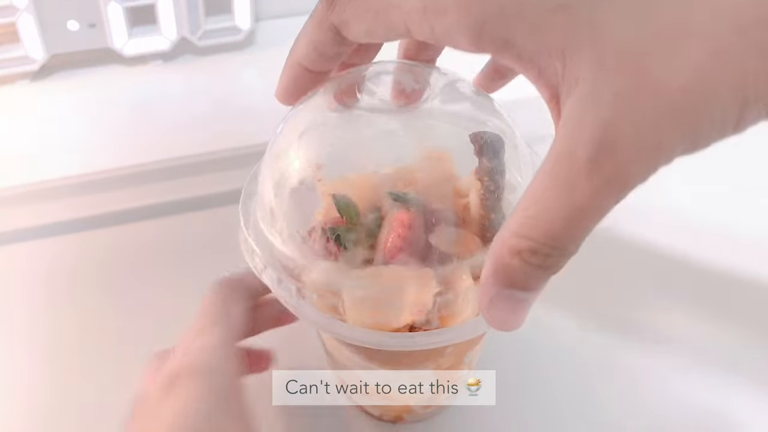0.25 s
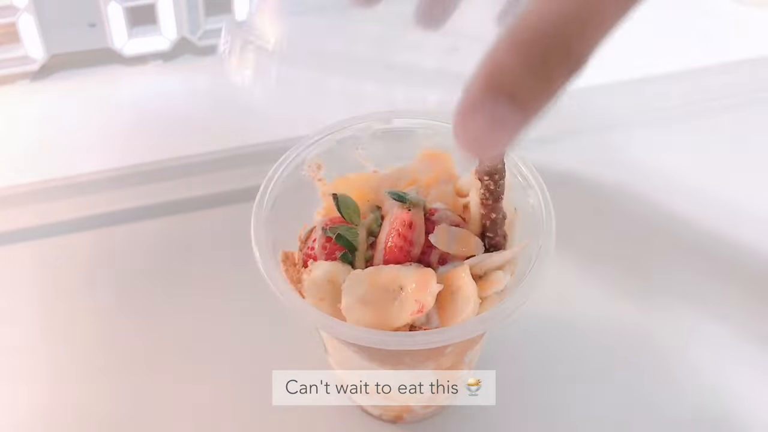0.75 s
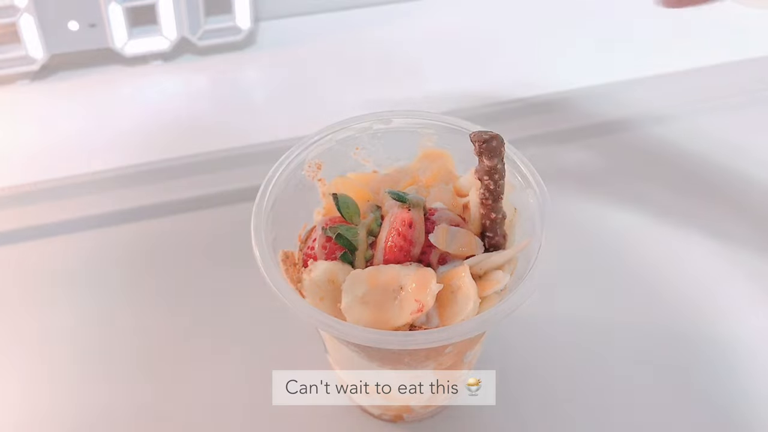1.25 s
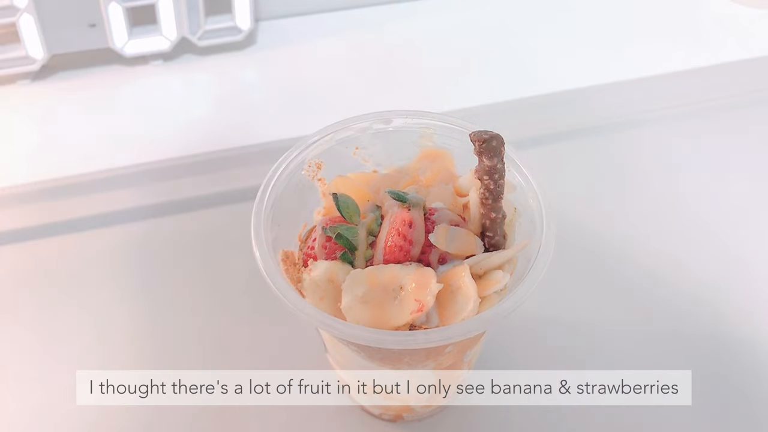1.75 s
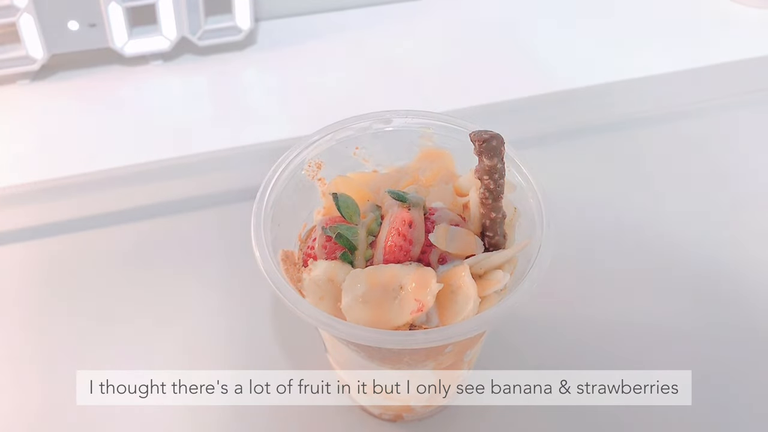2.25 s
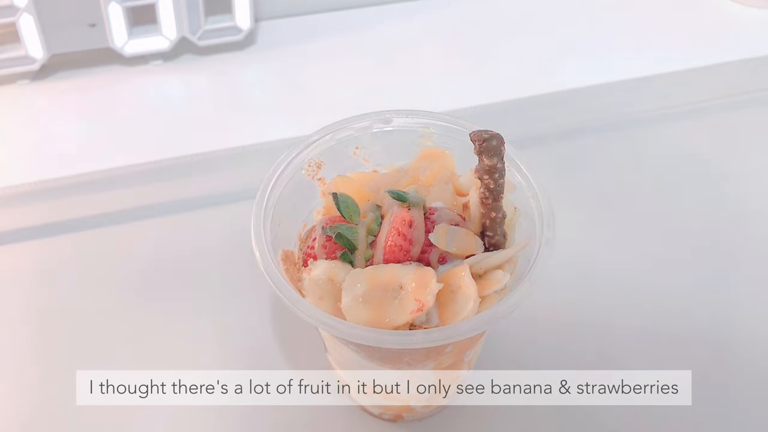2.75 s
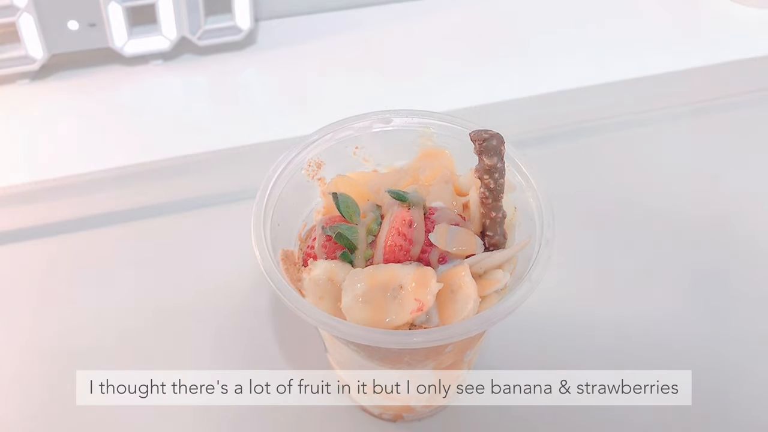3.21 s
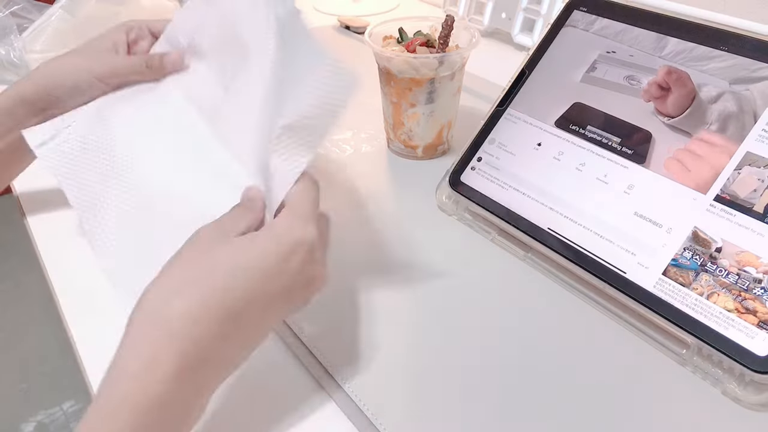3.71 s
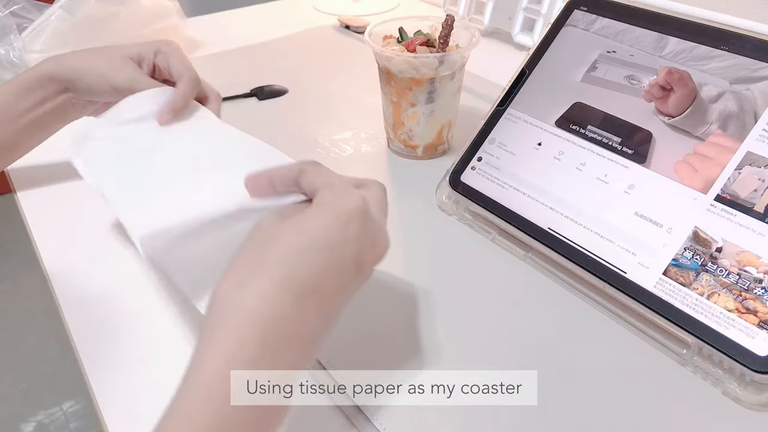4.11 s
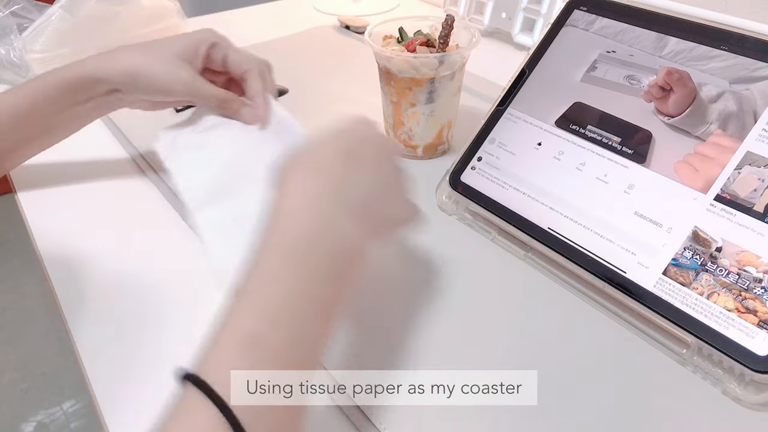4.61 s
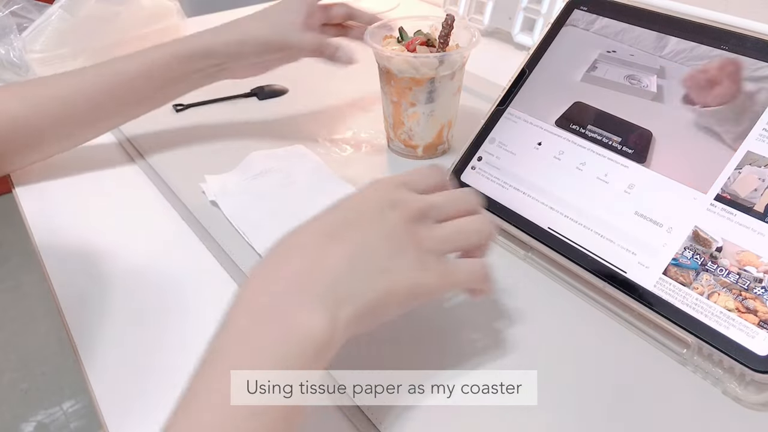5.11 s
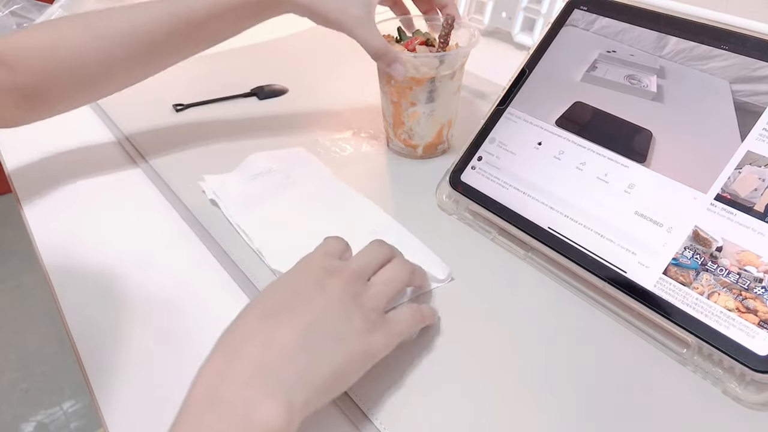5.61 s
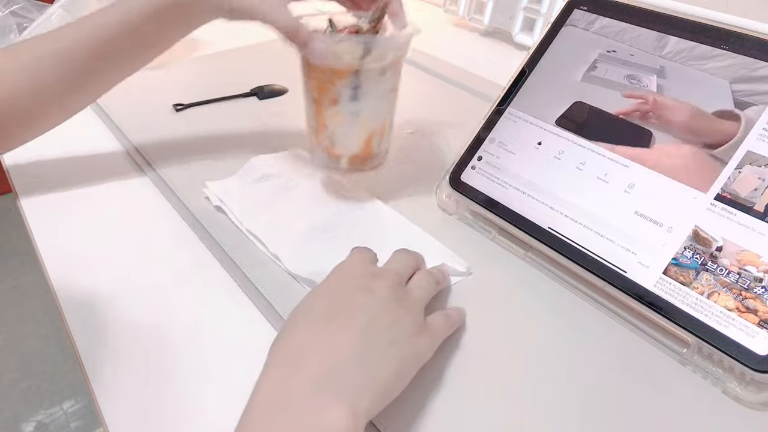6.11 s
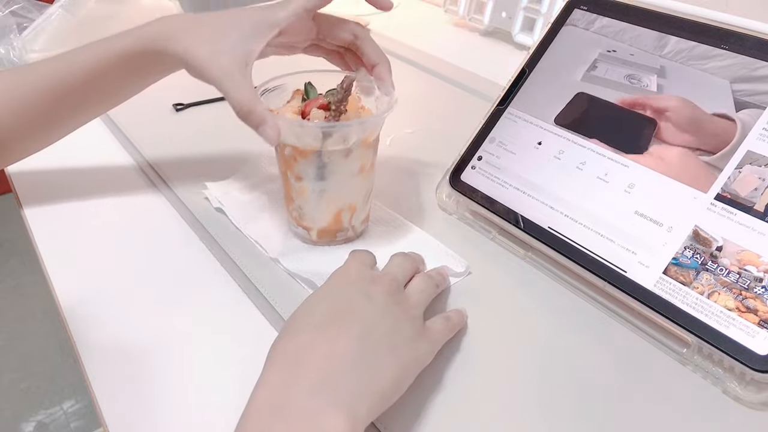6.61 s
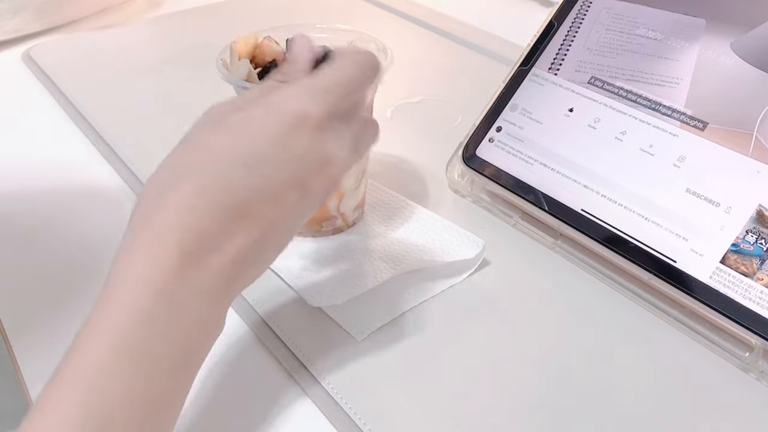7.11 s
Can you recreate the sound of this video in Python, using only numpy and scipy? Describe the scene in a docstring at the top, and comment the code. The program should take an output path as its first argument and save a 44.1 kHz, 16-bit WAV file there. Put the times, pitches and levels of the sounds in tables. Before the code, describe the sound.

A thin plastic dome lid clatters and rocks on a desk, then tissue rustles and a cup is set down in a softly rumbling room.

```python
"""Faint rubbing and a dry snap over rumbling, hissing room air come first, then a thin plastic dome lid
lifted off a cup scrapes, drops and rocks on a desk: short noise cracks and ringing tones.
A paper tissue is shaken open; the level dips briefly, and it is folded and smoothed: grainy noise.
The cup is lifted, set down and touched with a spoon: noise bursts, with an airy whistle and a desk hum."""
import sys
import numpy as np
from scipy import signal
from scipy.fft import rfft, irfft, next_fast_len
from scipy.io import wavfile
from scipy.ndimage import uniform_filter1d, map_coordinates

SR = 44100
rng = np.random.default_rng(int(sys.argv[2]) if len(sys.argv) > 2 else 0)


def persist_wave(psi):
    """Save psi, clipped to +-1, as 16-bit WAV."""
    counts = np.round(np.clip(psi, -1, 1) * 32767).astype(np.int16)
    wavfile.write(sys.argv[1], SR, np.atleast_2d(counts).T)


N = 324135

# Each touch of lid and desk; the pitches choose which tone of rim and dome leads. Levels before trims:
# start_s, contact_s, rim_db, rim_hz, dome_db, dome_hz, desk_db
LID_CONTACTS = [(1.878, 0.0017, -42, 5460, -47, 2030, -49), (1.9804, .0003, -24.5, 3490, -36, 2020, -38),
                (1.994, 0.013, -24, 3423, -39, 2020, -32), (1.999, 0.0006, -23.5, 5830, -53, 2030, -67),
                (2.013, 0.012, -24.5, 4090, -35, 1880, -63), (2.028, 0.0084, -31, 4200, -55, 2030, -35),
                (2.037, 0.0066, -30, 3150, -50, 2030, -52), (2.0458, 0.0006, -32, 5900, -52, 2030, -43),
                (2.103, 0.0052, -36, 4300, -57, 2060, -56), (2.113, .01, -35, 4400, -60, 2030, -58),
                (2.13, 0.004, -37, 4400, -60, 2030, -62), (2.1478, 0.0013, -24, 3240, -31, 2040, -24),
                (2.1493, 0.002, -17, 4680, -27, 1970, -16), (2.1988, .0001, -18, 3050, -10, 2200, -15),
                (2.2178, 0.0041, -23, 3750, -22, 1880, -23.5),
                (2.2656, 0.0023, -20, 4400, -27, 1920, -24.5),
                (2.2691, 0.0023, -23.5, 3680, -14.5, 1720, -25), (2.282, 0.0043, -28, 3610, -34, 1780, -40),
                (2.306, 0.0042, -27, 3500, -18, 1850, -21), (2.332, 0.0063, -29.5, 3460, -33, 1820, -31),
                (2.347, 0.0041, -31.5, 3360, -30, 1875, -30), (2.554, 0.002, -42, 4380, -46, 1820, -45.5),
                (2.601, 0.00085, -32.5, 4300, -51, 1820, -40),
                (2.603, 0.002, -32.5, 3240, -30.5, 1820, -28), (2.645, 0.0033, -36, 4470, -30.5, 1867, -26),
                (2.668, 0.008, -43, 4400, -35, 1890, -29), (2.684, 0.0038, -44.5, 3640, -34, 1870, -41),
                (2.695, 0.01, -47, 3610, -38, 1856, -35.5), (2.808, 0.019, -45, 3970, -43.5, 1780, -45),
                (2.839, 0.0089, -45.5, 3180, -45, 1720, -37.5), (2.97, 0.0063, -41, 3790, -38.5, 1855, -49),
                (3.0114, 0.0029, -39, 4400, -34, 1940, -33.5),
                (3.024, 0.015, -41.5, 4400, -37.5, 1816, -35)]
# Tones of the lid's rim: pitch_hz, level_db, time_to_fade_60_db_s
RIM_TONES = [(2900, 6, 0.014), (3227, 8.5, 0.019), (3507, 11, 0.016), (4070, 14.5, 0.0083),
             (4400, 10.5, 0.016), (4800, -7, 0.019), (5830, 3, 0.0087)]
# Tones of the lid's dome: pitch_hz, level_db, time_to_fade_60_db_s
DOME_TONES = [(1490, 3, 0.02), (1720, 0.5, 0.031), (1820, 4, 0.03), (1910, 1, 0.021), (1978, -3, 0.023),
              (2250, 5.5, 0.0056)]
# Long rings of the desk top: pitch_hz, level_db, time_to_fade_60_db_s
DESK_TONES = [(135.6, -5.5, 0.21), (172.7, 0.5, 0.95), (216.7, 0.5, 0.16), (278, -3.5, 0.12),
              (335, -13.5, 0.69), (823, -12.5, 0.22)]
# The hollow of the lid, woken by flat drops: pitch_hz, level_db, time_to_fade_60_db_s
HOLLOW_TONES = [(568, -7.5, 0.14), (715, -0.5, 0.19)]
# The rim chatters while the lid slides and rocks: peak_s, rise_s, fall_s, level_db
RIM_CHATTER = [(2.02, 0.079, 0.15, -40.5), (2.14, 0.25, .07, -59), (2.25, .06, 0.18, -54),
               (2.69, 0.17, 0.47, -50.5)]
CRACK_DB = 2  # added to the rim level
SMEAR_S = 0.002  # a contact this long favours its leading rim tone half as much
SCRAPE_S = 0.0028  # a contact this long is half first touch, half scrape


def lid():
    """Each contact cracks, thumps and rings rim, dome and desk; small chatter feeds the same shell."""
    out = np.zeros(N + SR)
    long_t = np.arange(SR) / SR
    t = long_t[:SR // 4]
    for start_s, contact_s, rim_db, rim_hz, dome_db, dome_hz, desk_db in LID_CONTACTS:
        noise = rng.standard_normal((4, len(t)))
        # only hard blows ring the desk and wake the whole rim; only the hardest land flat
        hard = np.clip(amp(2.5 * (desk_db + 22)), 0, 1)
        flat = np.clip(amp(3 * (desk_db + 17)), 0, 1)
        smear = 1 + contact_s / SMEAR_S
        picky = (1 - hard / 2) / smear

        crack_fade = amp(-60 * t / 0.0064) + 0.18 * amp(-60 * t / 0.19)
        crack = band(noise[0], 2300, 13500) * crack_fade * (1 - np.exp(-t / 0.000071))
        thump = 6 * band(noise[1], 49, 527) * amp(-60 * t / 0.15)
        # the burr is noise with one sharp click at its start
        click = (9 + 17 * flat / smear) * (t == 0)
        burr = (0.79 + 1.34 * hard) * band(noise[2] - click, 1400, 5800) * amp(-60 * t / 0.0041)
        rim = (1 - hard / 2) * ring(RIM_TONES, t, 0.00069, rim_hz, picky)
        dome = ring(DOME_TONES, t, 0.0011, dome_hz, 0.7)
        blow = amp(rim_db + CRACK_DB) * crack
        blow += amp(dome_db - 2.0) * dome + amp(rim_db - 6.0) * (rim + burr)

        # spread the blow over the contact time, keeping its loudness
        hump = np.sin(np.pi * np.clip((t + 1 / SR) / max(contact_s, 0.0001), 0, 1))
        scrape = noise[3] * hump
        touch = (t == 0) + contact_s / SCRAPE_S * scrape / np.linalg.norm(scrape)
        spread_blow = signal.fftconvolve(blow, touch[:SR // 40])[:len(t)]
        blow = unit(spread_blow) * np.std(blow)

        desk = hard * ring(DESK_TONES, long_t, 0.00074)
        hollow = flat * ring(HOLLOW_TONES, long_t, 0.002)
        first = round(start_s * SR)
        out[first:][:len(t)] += blow + amp(desk_db - 7.0) * thump
        out[first:][:SR] += amp(desk_db - 5.5) * (desk + hollow)

    def shell(f):
        """The lid answers at all its tones, over an even floor, with weaker lows and highest treble."""
        tones = sum(amp(db) * resonance(hz, 6.9 / t60)(f) for hz, db, t60 in DOME_TONES + RIM_TONES)
        return (11.0 + tones) * f / (f + 900) / (1 + (f / 12000) ** 2)

    chatter = unit(filtered(grainy(190, 4.0, 0.0023, 0.6), shell))
    return out[:N] + swells(RIM_CHATTER)[0] * chatter


FLUTTER = 0.7  # depth of the loose shell's wavering
FAR_DB_PER_OCTAVE, FAR_MOST_DB = 70, 16  # tones far from the leading one answer less; scaled by picky


def ring(modes, t, attack, near_hz=None, picky=1):
    """One blow on a set of tones; the loose shell bends until one tone sits on near_hz and leads."""
    hz, db, t60 = np.transpose(modes)[..., None]
    if near_hz:
        lead = hz[np.argmin(np.abs(hz - near_hz))]
        db = np.where(hz == lead, db.max(), db)
        hz = hz * near_hz / lead
    tones = amp(db - 60 * t / t60) * np.sin(2 * np.pi * hz * t) * (1 - np.exp(-t / attack))
    if near_hz:
        flutter = uniform_filter1d(rng.standard_normal(tones.shape), size=160)
        far_db = np.minimum(FAR_DB_PER_OCTAVE * np.abs(np.log2(hz / near_hz)), FAR_MOST_DB)
        tones *= amp(-picky * far_db) * (1 + FLUTTER * unit(flutter))
    return tones.sum(axis=0)


# The tissue is shaken open, then folded and smoothed: time_s, fizz_db, brightness_db
TISSUE_MOVES = [
    [(3.12, -57, -2), (3.636, -43, -2), (3.672, -43.5, -5)],
    [(3.674, -51.5, -3), (3.734, -41, -7), (3.892, -36.5, -7), (3.952, -39, -7), (4.198, -39.5, -3),
     (4.208, -37.5, -1), (4.312, -49, -7.5), (4.46, -48.5, -6.5), (4.529, -58, -4)],
    [(4.53, -48, -9), (4.55, -36.5, -5), (4.62, -28.5, -3), (4.686, -30, 3), (4.79, -38.5, -3),
     (4.864, -37, -1.5), (5.0, -56.5, -6), (5.3, -68, -12)],
]
# Single strokes of skin, paper and spoon: peak_s, rise_s, fall_s, fizz_db, brightness_db
SINGLE_STROKES = [(0.24, 1, 0.37, -59.5, -13), (1.65, 1.3, 0.35, -57.5, -6), (5.356, 0.017, 0.061, -40, -4),
                  (5.485, 0.013, 0.11, -34.5, -4.5), (5.68, 0.35, 0.067, -47, -7),
                  (6.12, 0.59, 0.078, -47, -5), (6.45, 0.43, 0.35, -57.5, -10), (7.0, 2.4, 1, -63, -9),
                  (7.192, 0.047, 0.23, -54.5, -16)]
# Tone colour of the fizz: pitch_hz, level_db (per Hz, only the shape counts)
FIZZ_COLOUR = [(880, -6.5), (1500, -1.5), (1800, 0.5), (4350, 3), (4740, 0.5), (6460, 3), (10000, -11.5),
               (13000, -36), (22000, -120)]
# Tone colour of the duller body: pitch_hz, level_db (per Hz, only the shape counts)
BODY_COLOUR = [(120, -120), (220, 1), (500, 0.5), (800, -2), (1700, -1), (3000, -40), (6000, -120)]
# The taut sheet drones in its middle range: peak_s, rise_s, fall_s, level_db
TAUT_SHEET = [(4.625, 0.067, 0.065, -37), (4.68, 0.057, 0.18, -35.5)]
TAUT_HZ, TAUT_WIDTH_HZ = 1580, 430
UNSTEADY_DB, CHANGES_PER_S = 2, 27  # hands never slide evenly


def rustle():
    """Fibres slip in dense grains: a fizz, its airy top and the duller body of the sheet."""
    fizz, top, body = gains(*map(layers, TISSUE_MOVES)) + swells(layers(SINGLE_STROKES))
    knots = rng.standard_normal(int(N / SR * CHANGES_PER_S) + 4)
    wander = map_coordinates(knots, [np.arange(N) / SR * CHANGES_PER_S])
    slips = amp(UNSTEADY_DB * wander) * grainy(370, 1.7, 0.00077, 0.13)
    sheet = grainy(150, 3, 0.008, 0.6)
    taut = swells(TAUT_SHEET)[0] * unit(filtered(sheet, resonance(TAUT_HZ, TAUT_WIDTH_HZ)))
    airy_top = top * unit(band(slips, 7880, 15300))
    return taut + fizz * coloured(slips, FIZZ_COLOUR) + airy_top + body * coloured(sheet, BODY_COLOUR)


# Duller sliding has more body, set relative to the fizz
BODY_DB, BODY_PER_DULL, BODY_MOST_DB = -20.5, 2.2, 2


def layers(rows):
    """Turns fizz and brightness into the levels of fizz, airy top and body."""
    levels = []
    for *when, db, bright in rows:
        body_db = db + min(BODY_DB - BODY_PER_DULL * bright, BODY_MOST_DB)
        levels.append((*when, db, db + bright, body_db))
    return levels


# Dry snaps of fingers, paper creases and spoon, levels before trims:
# start_s, level_db, pitch_hz, thud_db
DRY_SNAPS = [(0.31, -40.5, 4000, -66), (0.903, -38, 4500, -70), (0.912, -32, 5050, -73),
             (1.194, -29, 780, -31), (3.475, -30.5, 2510, -43), (3.63, -35, 1080, -36.5),
             (4.536, -36, 3500, -71), (5.342, -27.5, 3660, -47), (5.352, -29.5, 3800, -44),
             (5.354, -33, 990, -58), (5.4835, -26.5, 3180, -51), (5.484, -27, 885, -52),
             (5.512, -25.5, 5440, -73), (6.749, -34.5, 600, -41), (7.1758, -23.5, 4600, -50),
             (7.1762, -30, 1260, -59), (7.297, -47, 1300, -70)]
# Soft scuffs of hand and cup on the desk, levels before trims: start_s, level_db, pitch_hz, thud_db
SOFT_SCUFFS = [(4.343, -36.5, 1240, -39.5), (4.892, -23, 890, -42), (5.607, -31.5, 690, -53),
               (6.046, -26.5, 655, -62), (6.109, -31, 2000, -70), (6.107, -21, 770, -60),
               (6.407, -22, 615, -38), (6.43, -19.5, 420, -58), (6.432, -30.5, 1760, -62),
               (6.51, -36, 590, -41), (6.679, -37, 490, -36), (6.715, -41, 400, -48)]


def ticks():
    """Short snaps start at once; longer, softer scuffs swell in more slowly."""
    snaps = bursts(DRY_SNAPS, rise=0.000057, length=0.016, spread=1.55, air=0.5, blow=2.64)
    return snaps + bursts(SOFT_SCUFFS, rise=0.0087, length=0.14, spread=1.22, air=0.33, blow=0)


def bursts(table, rise, length, spread, air, blow):
    """Noise bursts around a broad pitch, each with a dull thud; blow is the weight of the first contact."""
    out, t = np.zeros(N + SR), np.arange(SR // 4) / SR
    for start_s, db, hz, thud_db in table:
        noise = rng.standard_normal((2, len(t))) * (1 - np.exp(-t / rise)) + blow * np.exp(-t / 0.0001)
        snap = band(noise[0], hz / spread, hz * spread) * np.sqrt(9000 / hz)
        snap += air * band(noise[0], hz, 4 * hz)
        snap *= amp(-60 * t / length)
        thud = band(noise[1], 168, 336) * amp(-60 * t / (length + 0.024))
        out[round(start_s * SR):][:len(t)] += amp(db - 1.5) * snap + amp(thud_db + 20.5) * thud
    return out[:N]


# A narrow airy hiss near 8.5 kHz: peak_s, rise_s, fall_s, level_db
AIRY_WHISTLE = [(5.0, .05, 2.8, -60.5), (6.112, 0.11, 0.028, -45.5)]
# The desk hums as the cup is moved: peak_s, rise_s, fall_s, level_db
DESK_HUM = [(6.196, 0.073, 0.31, -36), (6.39, 0.069, 0.34, -40)]


def hums():
    """An airy whistle of narrow noise; the desk's hum is a steady tone wavering with noise beside it."""
    def narrow(hz, width_hz):
        """Noise passed twice through one resonance."""
        return unit(filtered(rng.standard_normal(N), lambda f: resonance(hz, width_hz)(f) ** 2))

    hum = 0.82 * np.sin(2 * np.pi * 229 * np.arange(N) / SR) + 0.47 * narrow(194, 235)
    return swells(AIRY_WHISTLE)[0] * narrow(8560, 350) + swells(DESK_HUM)[0] * hum


# Moving arms stir air and desk: peak_s, low_band_db, upper_band_db
ARM_RUMBLE = [(2.05, -57, -61), (2.65, -51, -46.5), (3.58, -48, -56.5), (3.85, -73, -42.5),
              (3.98, -51, -47.5), (4.4, -46.5, -52), (5.57, -44, -48.5), (6.66, -48, -76)]
# Tone colour of the steady air: pitch_hz, level_db (per Hz, only the shape counts)
AIR_COLOUR = [(15, 3.5), (40, 3.5), (110, -1.5), (200, -5.5), (500, -14.5), (1000, -16.5), (2500, -20),
              (4500, -24.5), (5300, -27), (6500, -24.5), (8000, -29.5), (12000, -32.5), (16000, -35)]
AIR_DB = -49.5
STIR_RISE_S, STIR_FALL_S = 0.27, 0.61  # for each swell of rumble
STILL_LOW_DB, STILL_UPPER_DB = -57.5, -63.5  # rumble at rest


def room():
    """Steady air noise, with two low bands that swell as arms move."""
    stirs = swells([(peak_s, STIR_RISE_S, STIR_FALL_S, *db) for peak_s, *db in ARM_RUMBLE])
    low, upper = amp([STILL_LOW_DB, STILL_UPPER_DB])[:, None] + stirs
    noise = rng.standard_normal((3, N))
    rumble = low * coloured(noise[0], [(10, -61), (25, 1), (50, 10.0), (75, 1), (130, -43.0)])
    rumble += upper * coloured(noise[1], [(60, -48), (92, 0.5), (106, -3), (135, -1.5), (250, -30.5)])
    return amp(AIR_DB) * coloured(noise[2], AIR_COLOUR) + rumble


def amp(db):
    """Turns decibels into a plain multiplier."""
    return 10 ** (np.asarray(db) / 20)


def unit(x):
    """Scales a sound to an average (rms) level of 1."""
    return x / np.sqrt(np.mean(x ** 2) + 1e-20)


def gains(*tables):
    """One gain per sample for each dB column, joined by straight lines; near silent outside the tables."""
    t = np.arange(N) / SR
    total = 0
    for table in tables:
        time_s, *columns = np.transpose(table)
        total = total + np.array([amp(np.interp(t, time_s, db, -200, -200)) for db in columns])
    return total


def swells(rows):
    """Gains per dB column; a swell climbs 20 dB in its rise time and drops 20 dB in its fall time."""
    peak_s, rise, fall, *columns = np.transpose(rows)[..., None]
    since = np.arange(N) / SR - peak_s
    shapes = amp(-20 * np.maximum(-since / rise, since / fall))
    return amp(np.array(columns)[..., 0]) @ shapes


def filtered(x, response):
    """Multiplies each frequency in x by the response there."""
    m = next_fast_len(N + SR // 2)
    return irfft(rfft(x, m) * response(np.fft.rfftfreq(m, 1 / SR)), m)[..., :N]


def coloured(x, points):
    """Shapes x through (Hz, dB) points on a log pitch axis, then scales it to rms 1."""
    f, db = np.transpose(points)
    return unit(filtered(x, lambda hz: amp(np.interp(np.log(hz + 1), np.log(f + 1), db))))


def resonance(centre_hz, width_hz):
    """The response of one ringing resonance, which never sounds before it is struck."""
    return lambda f: 1j * f * width_hz / (centre_hz ** 2 - f * f + 1j * f * width_hz)


def band(x, lo_hz, hi_hz):
    """Keeps the sound between two pitches, without sounding early."""
    sos = signal.butter(2, [lo_hz, min(hi_hz, 20000)], "band", fs=SR, output="sos")
    return signal.sosfilt(sos, x)


def grainy(rate, spread_db, life, share):
    """Noise whose loudness jumps in short grains of scattered size: rate per second, life in seconds."""
    starts = (rng.random(N) < rate / SR) * amp(spread_db * rng.standard_normal(N))
    grains = signal.lfilter([1], [1, -np.exp(-1 / (life * SR))], starts)
    return unit(rng.standard_normal(N) * (1 + share * unit(grains)))


def scene():
    """Near walls add a short tail to the hits; four tails take turns about every 25 ms."""
    hits = lid() + ticks()
    t = np.arange(SR // 2) / SR
    tails = band(rng.standard_normal((4, len(t))), 750, 5600) * amp(-60 * t / 0.35) * (t > 0.004)
    turn = np.arange(N) // (SR // 40) % len(tails)
    walls = np.zeros(N)
    for k, tail in enumerate(tails):
        walls += signal.fftconvolve(hits * (turn == k), tail / np.linalg.norm(tail))[:N]
    mono = hits + amp(-14) * walls + rustle() + hums() + room()
    return np.tile(mono, (2, 1))  # one microphone feeds both channels


DIP_S, FADE_S = 3.672, 0.06  # when the level dips; about how long it takes to climb back
TOP_HZ = 15900  # treble limit


def record(dry):
    """The level drops suddenly and climbs back; a microphone notch and a steep treble limit follow."""
    since = np.arange(N) / SR - DIP_S
    x = dry * np.where(since < 0, 1, np.clip(0.033 + since / FADE_S, 0, 1))
    return filtered(x, lambda f: (1 - 0.64 * resonance(10400, 350)(f)) / (1 + (f / TOP_HZ) ** 80))


dry = scene()
out = record(dry)
persist_wave(out)
```